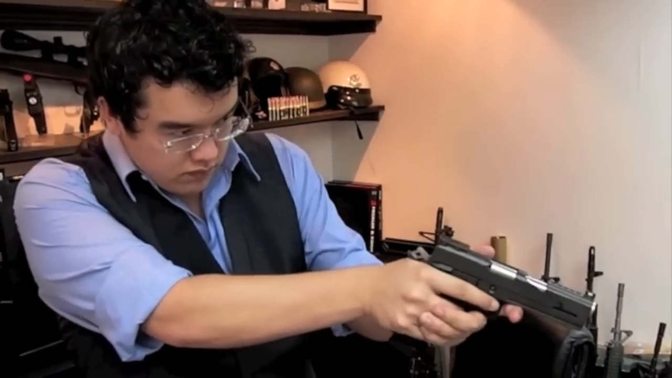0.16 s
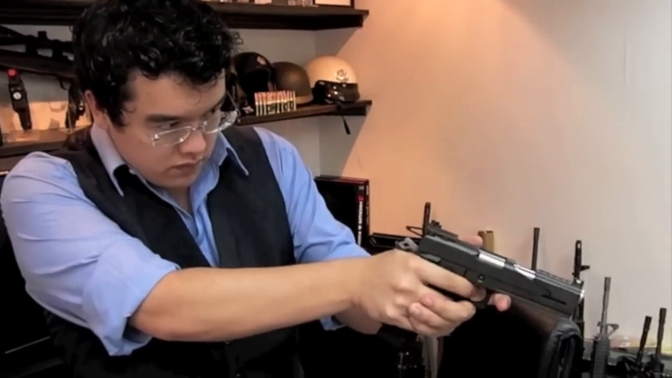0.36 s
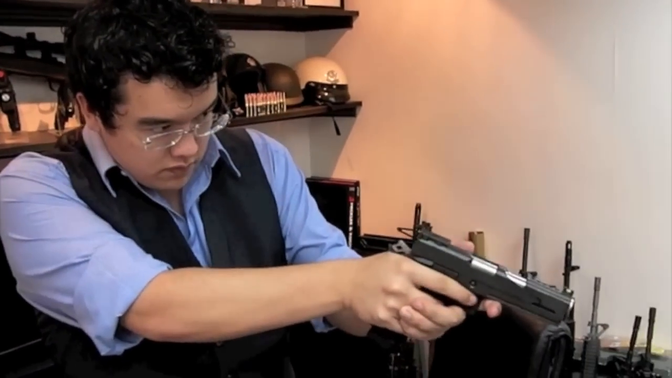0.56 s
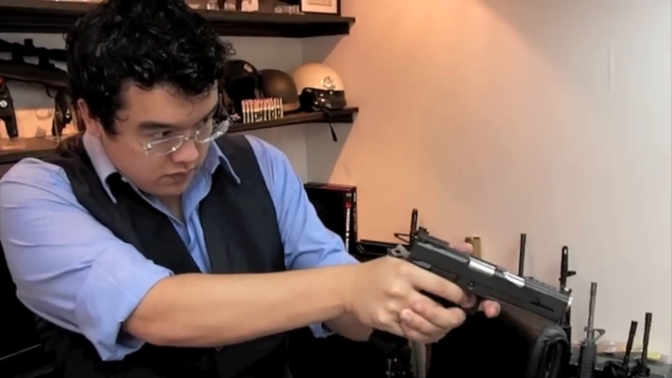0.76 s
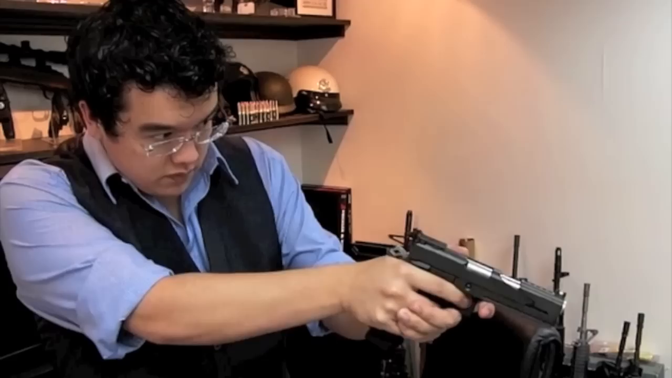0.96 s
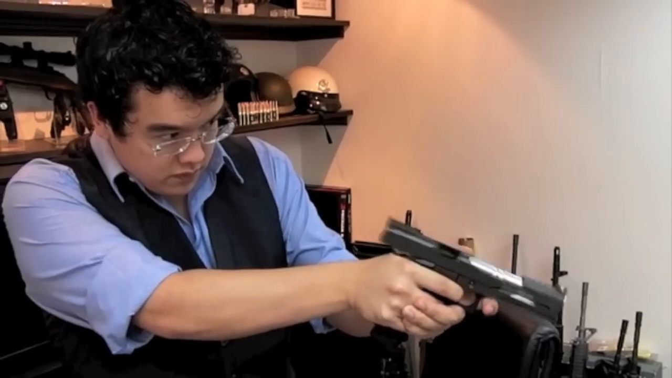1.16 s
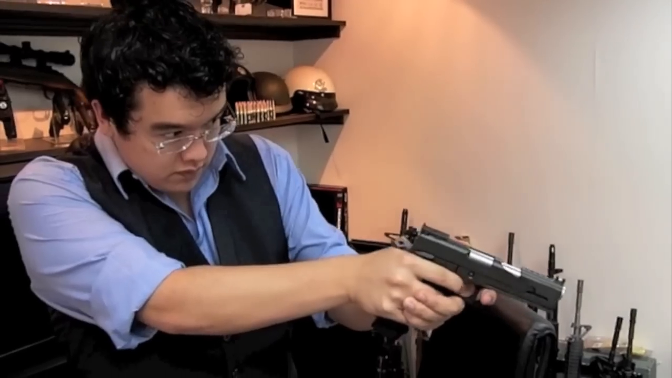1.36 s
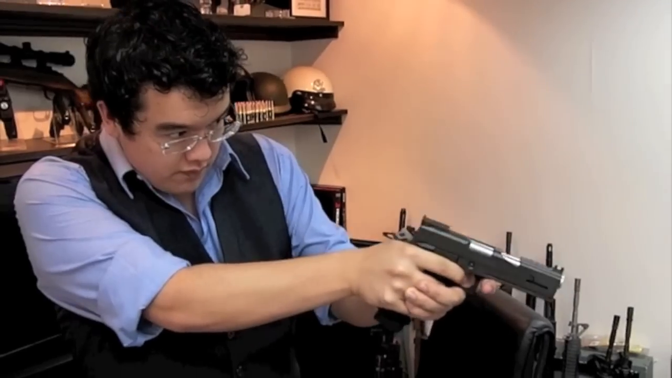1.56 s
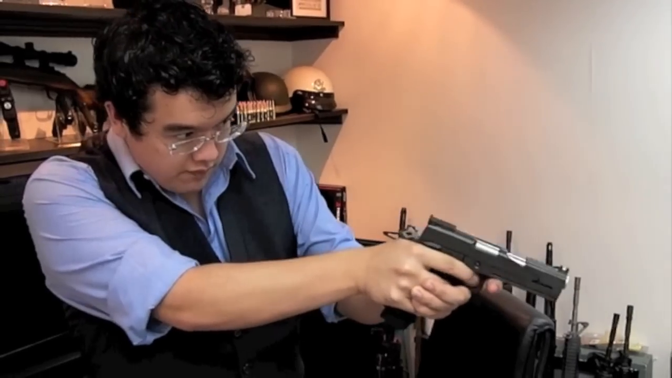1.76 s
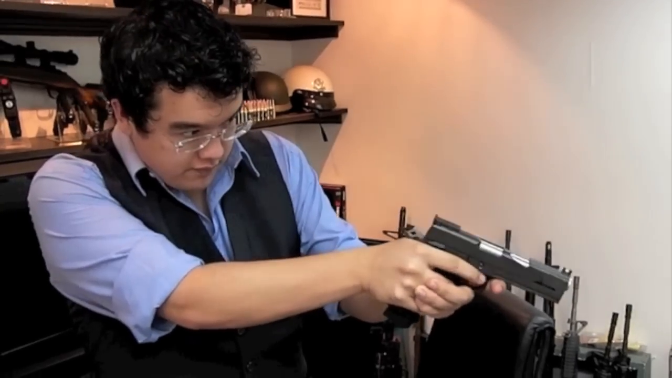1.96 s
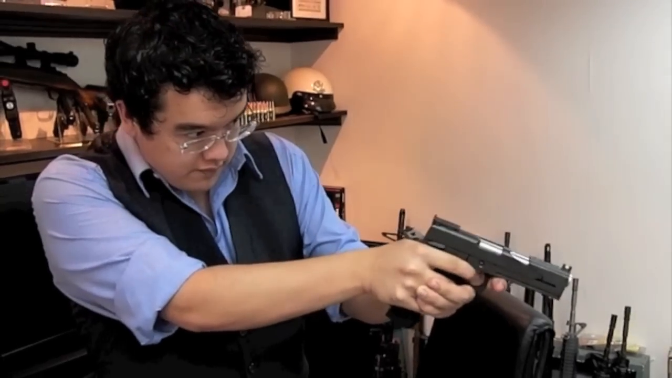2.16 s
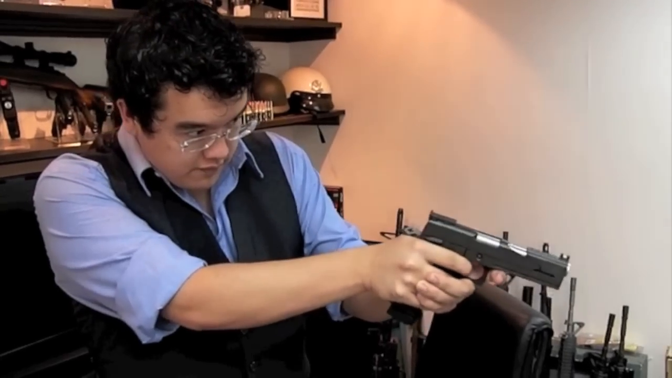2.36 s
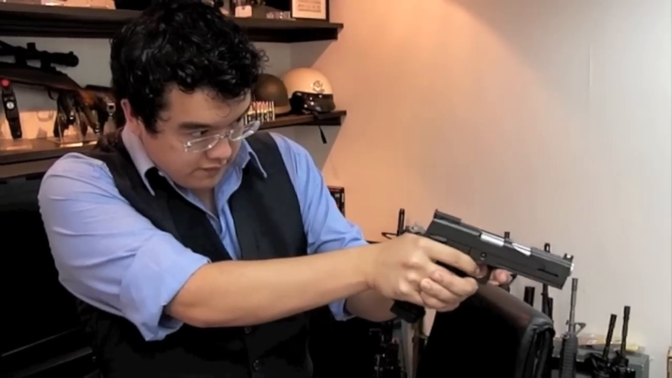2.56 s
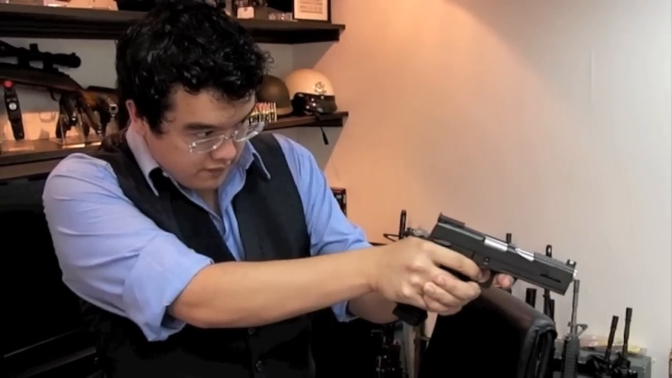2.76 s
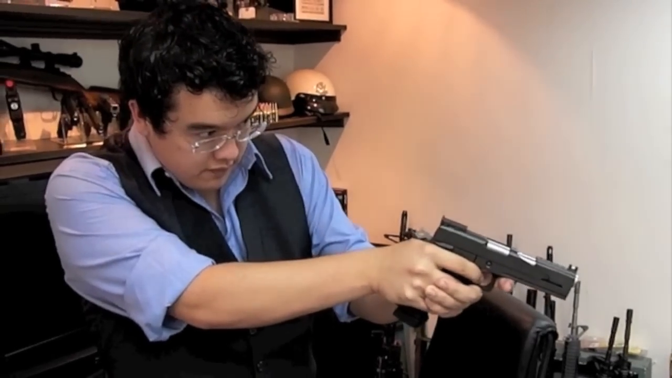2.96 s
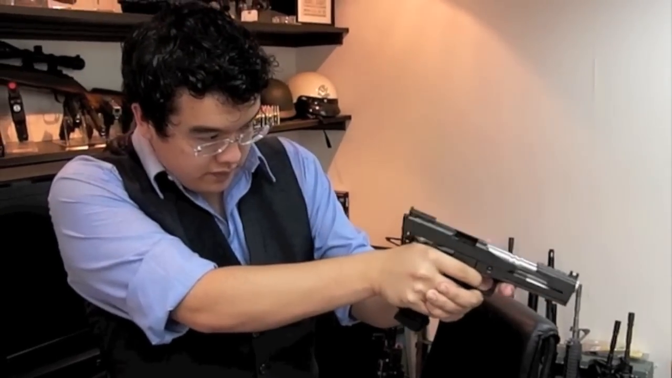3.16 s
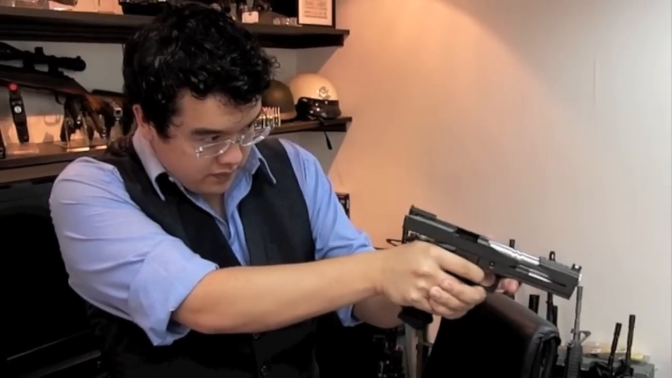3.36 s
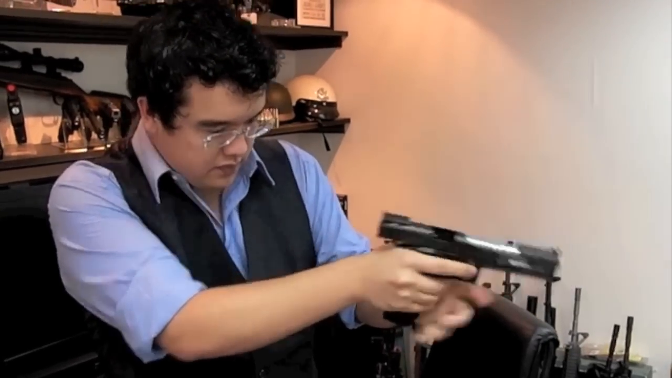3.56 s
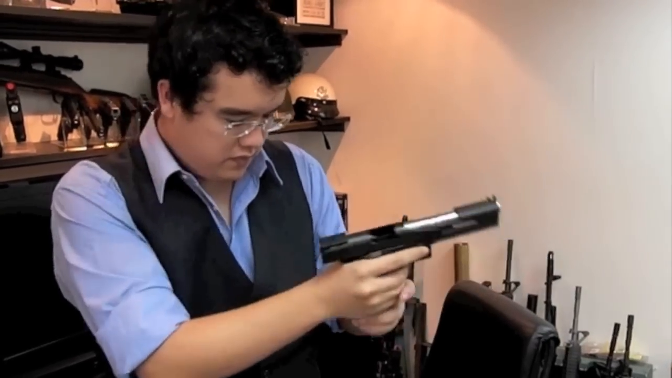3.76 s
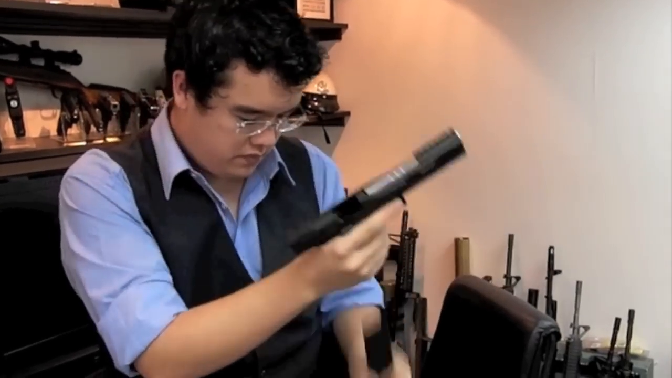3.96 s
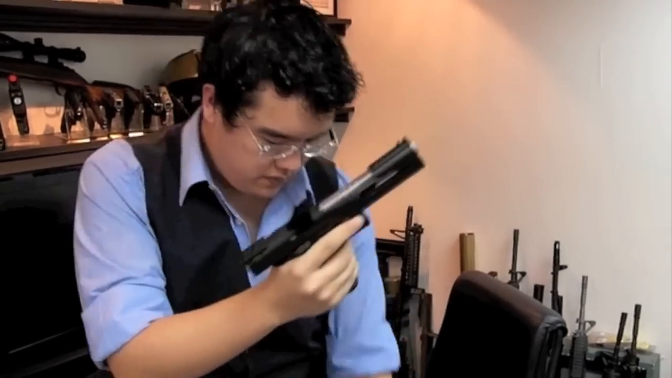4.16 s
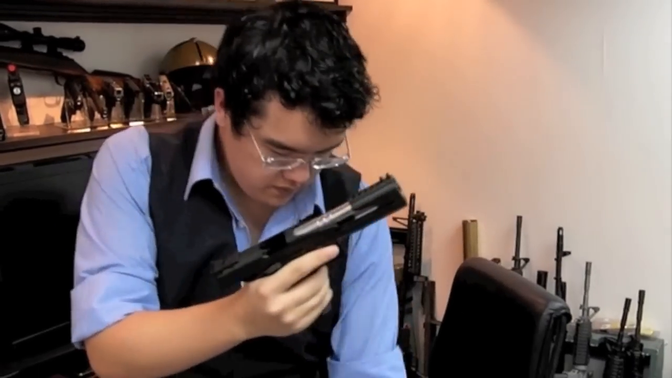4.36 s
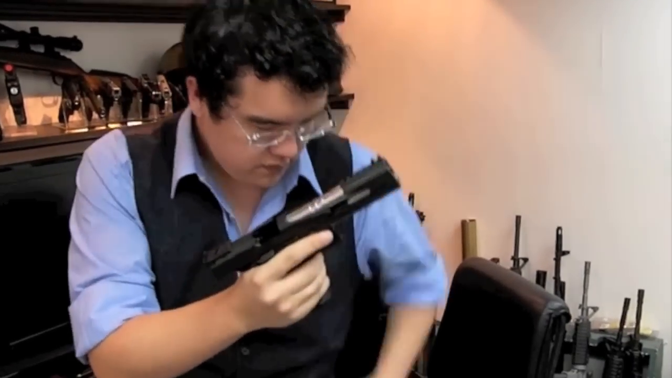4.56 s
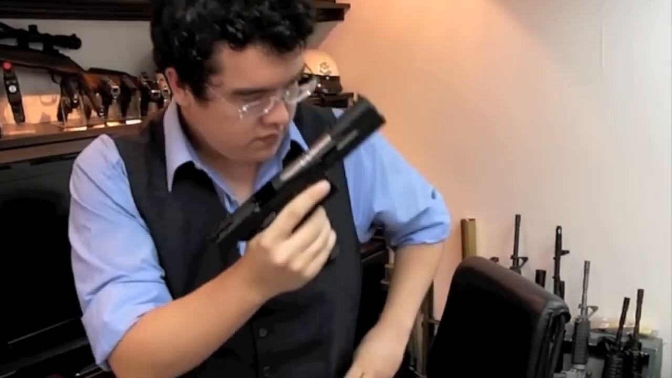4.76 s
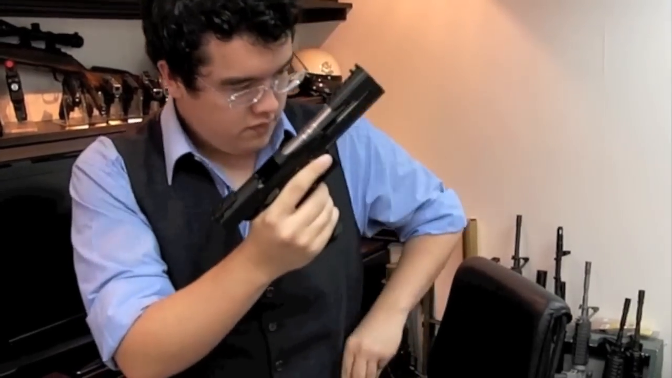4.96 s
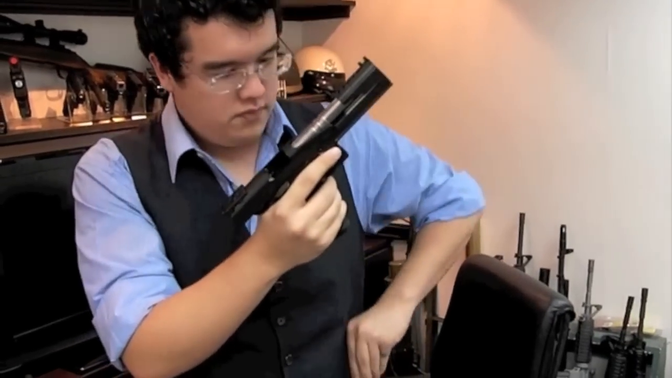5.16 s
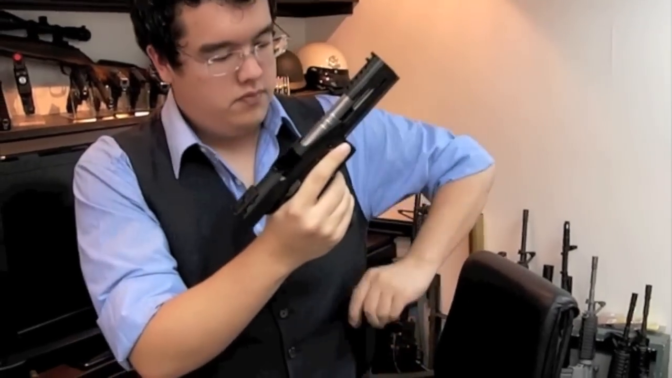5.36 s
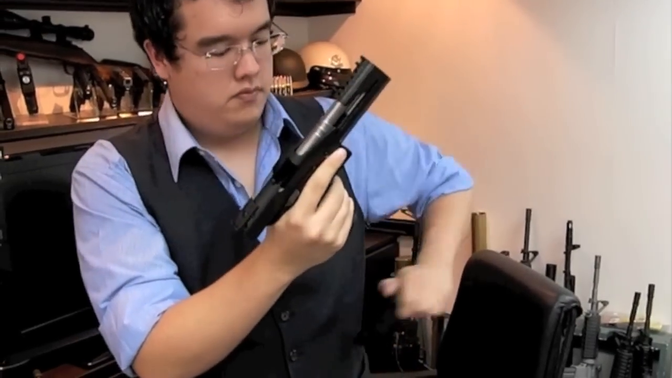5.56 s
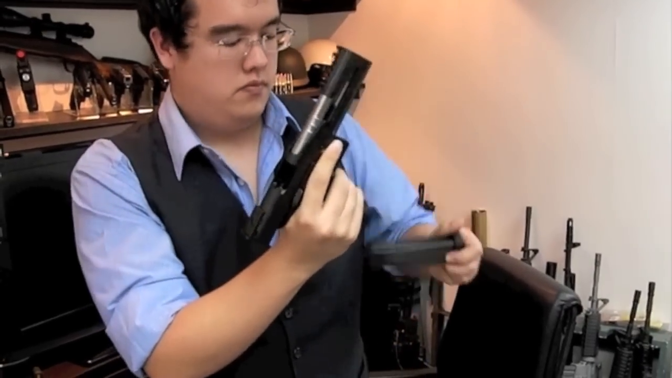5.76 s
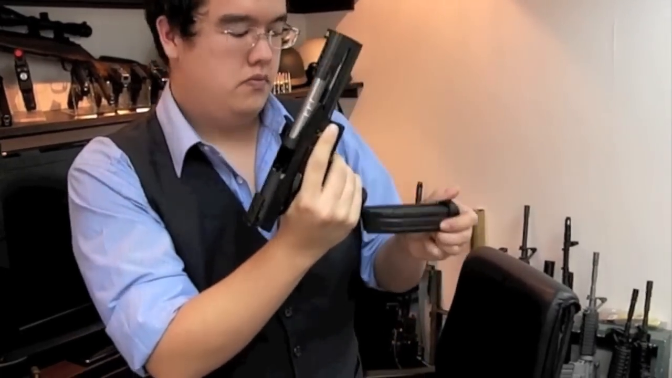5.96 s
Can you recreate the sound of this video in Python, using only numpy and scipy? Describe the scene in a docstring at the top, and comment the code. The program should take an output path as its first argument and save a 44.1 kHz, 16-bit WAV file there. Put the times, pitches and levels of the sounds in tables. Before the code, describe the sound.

A gas blowback airsoft pistol fires close to the microphone in a small room. Each shot is a sharp pop with the clack of a metal slide. Nine shots come in a quickening string, and after a pause a tenth locks the slide open. Quieter clicks and a knock follow as the magazine is drawn out, then faint scraping and a sleeve rustle. A fan and low electrical hum run underneath.

```python
"""A gas blowback airsoft pistol fires ten shots, close to a stereo microphone in a small, humming room.
Each shot is a chain: the hammer knocks the valve, gas pops from the muzzle, the slide hits its rear
stop and slams home. After the last shot the slide stays open; the magazine is drawn out and a fresh
one is fetched from the belt. The walls answer every blow, and the recorder's gain control ducks
the fan and mains hum under the shots."""
import sys
import numpy as np
from scipy import signal
from scipy.fft import rfft, irfft
from scipy.io import wavfile
from scipy.ndimage import uniform_filter1d, minimum_filter1d

SR = 44100
rng = np.random.default_rng(int(sys.argv[2]) if len(sys.argv) > 2 else 0)


def to_wav(sig):
    """Store sig (one row per channel, or 1-D mono) as 16-bit WAV at the path in sys.argv[1].

    Samples outside -1..1 are clipped; the rate is SR.
    """
    pcm = np.clip(np.atleast_2d(sig), -1, 1) * 32767
    pcm = np.round(pcm).astype(np.int16)
    wavfile.write(sys.argv[1], SR, pcm.T)  # frames by channels


N = 269010
TIME = np.arange(N) / SR
ANTIPHASE = np.array([[1], [-1]])  # left, right


def from_db(db):
    """Decibels to gain."""
    return 10 ** (np.asarray(db) / 20)


def rms_one(x):
    """Scale to rms 1."""
    return x / np.sqrt(np.mean(x ** 2) + 1e-20)


def flutter(span, size=N):
    """Random wobble of rms 1, smoothed over span samples."""
    return rms_one(uniform_filter1d(rng.standard_normal(size), span))


def at_hz(points, hz):
    """A spectrum read on a log-frequency axis."""
    points = np.array(points)
    return np.interp(np.log(hz + 1), np.log(points[:, 0] + 1), points[:, 1])


def colour(x, spectrum, tilt_db=0, size=8192):
    """Minimum-phase filter with the given spectrum, tilted by tilt_db per octave about 2 kHz."""
    hz = np.arange(size // 2 + 1) * SR / size
    octaves = np.log2(np.maximum(hz, 250) / 2000)
    cepstrum = irfft(np.log(from_db(at_hz(spectrum, hz) + tilt_db * octaves)))
    cepstrum[1:size // 2] *= 2
    cepstrum[size // 2 + 1:] = 0
    return signal.fftconvolve(x, irfft(np.exp(rfft(cepstrum))))[:len(x)]


def crossover(x, hz):
    """Split into lows and highs."""
    return [signal.sosfilt(signal.butter(3, hz, kind, fs=SR, output="sos"), x)
            for kind in ("low", "high")]


def noise(spectrum):
    """Coloured noise of rms 1."""
    return rms_one(colour(rng.standard_normal(N), spectrum))


def add(out, sound, s):
    """Mix a sound in at a time."""
    i = max(round(s * SR), 0)
    out[i:i + len(sound)] += sound[:N - i]


def strikes(rows):
    """One click for each (time [s], level [dB])."""
    out = np.zeros(N)
    for s, db in rows:
        out[round(s * SR)] += from_db(db)
    return out


def ring(x, modes):
    """The input sets each mode ringing as a decaying sine."""
    out = 0
    for k, (hz, db, t60) in enumerate(modes):
        r, w = np.exp(-np.log(1000) / (t60 * SR)), 2 * np.pi * hz / SR
        mode = signal.lfilter([0, np.sin(w)], [1, -2 * r * np.cos(w), r * r], x + 1e-18)
        out = out + (-1) ** k * from_db(db) * mode
    return out


def struck(rows, modes, spread_db=1.5):
    """Blows (time [s], level [dB]) on steel; each wakes every mode with a strength of its own."""
    offsets_db = spread_db * rng.standard_normal((len(rows), len(modes)))
    out = 0
    for mode, offsets in zip(modes, offsets_db.T):
        blows = strikes([(s, db + offset) for (s, db), offset in zip(rows, offsets)])
        out = out + ring(blows, [mode])
    return out


def bursts(rows, spectrum, lead_s, hold_s, decay_s, rattle_db, rattle_s):
    """Runs of tiny impacts that rise, hold and rattle out: (time [s], level [dB], tilt [dB/octave])."""
    size, spread_db = 3072, 3.5
    out, t = np.zeros(N), (np.arange(size) - 300) / SR
    after = np.maximum(t - hold_s, 0)
    fall = np.exp(-after / decay_s) + from_db(rattle_db) * np.exp(-after / rattle_s)
    shape = np.exp(np.minimum(t, 0) / lead_s) * fall
    for s, db, tilt_db in rows:
        impacts = rng.choice([-1, 1], size) * from_db(spread_db * rng.standard_normal(size))
        burst = colour(shape * impacts, spectrum, tilt_db)
        burst *= np.sqrt(np.sum(shape ** 2) / np.sum(burst ** 2))
        add(out, from_db(db) * burst, s + t[0])
    return out


def puffs(rows, size=1024):
    """One short swing of air pressure for each (time [s], level [dB], width [s])."""
    out, t = np.zeros(N), (np.arange(size) - size // 2) / SR
    for s, db, width_s in rows:
        u = t / width_s
        add(out, from_db(db) * u * np.exp((1 - u * u) / 2), s + t[0])
    return out


def swells(rows):
    """One bell curve for each (middle [s], half length [s], level [dB])."""
    return sum(from_db(db) * np.exp(-np.minimum(((TIME - s) / half_s) ** 2, 50))
               for s, half_s, db in rows)


# mains hum and fan tones in the room: (frequency [Hz], level [dB])
HUM_TONES = [(53.8, -51), (102.3, -46.5), (199.2, -51), (301.5, -51.5), (339.1, -58.5), (398.4, -60.5),
             (532.9, -63), (721.4, -63), (904.4, -61), (1082, -69.5), (1448, -64), (1626, -72)]
# fan rush at the microphone, shared by both sides and opposed between them: (frequency [Hz], level [dB])
FAN_MID = [(12, -44), (20, -7.5), (101, -4), (158, -10.5), (262, -10), (293, -15), (367, -16), (923, -23),
           (1330, -27.5), (1480, -30), (2260, -29.5), (2820, -53.5), (7950, -51), (11800, -75),
           (16000, -38)]
FAN_SIDE = [(12, -37), (20, -6), (101, -2.5), (262, -6), (301, -5), (499, -11), (718, -6), (780, -15),
            (897, -3.5), (1220, -14), (1480, -0.5), (1610, -9.5), (2320, -13), (2910, -25.5), (16000, -23)]
def room_tone():
    """A fan's rush with mains hum and faint wavering tones."""
    mid, side = from_db(-45.5) * noise(FAN_MID), from_db(-50) * noise(FAN_SIDE)
    for hz, db in HUM_TONES:
        waver_hz = 1.5 * np.interp(TIME, np.linspace(0, TIME[-1], 60), rng.standard_normal(60))
        phase = 2 * np.pi * np.cumsum(hz + waver_hz) / SR
        mid = mid + from_db(db) * np.sqrt(2) * np.sin(phase)
    return from_db(1.8) * (mid + side * ANTIPHASE)


# (time [s], trigger [dB], hammer [dB], valve crack [dB], gas push [dB], closing tick [dB], clack [dB])
SHOTS = [(0.0476, -45, 0, -7, -25, -23.5, -16), (0.4604, -31.5, -0.5, -8.5, -19.5, -14, -13.5),
         (0.8651, -31, 1, -3.5, -24, -13.5, -15), (1.2103, -30.5, -1, -5.5, -24.5, -11, -16),
         (1.4671, -34.5, -4, -29.5, -41.5, -12.5, -8), (1.6731, -44.5, -2.5, -26.5, -38.5, -13, -12),
         (1.8882, -27, 1.5, -25, -43, -12.5, -14.5), (2.1093, -41, -1, -23, -37, -14.5, -14),
         (2.3457, -30.5, -1.5, -26.5, -32, -11, -7.5), (3.1306, -48, 1.5, -45.5, -24, None, None)]
# small parts clicking and rubbing in the hands: (frequency [Hz], level [dB])
CLICK_COLOUR = [(100, -33.5), (700, -27.5), (1100, -5.5), (1600, 3), (2300, 5), (3100, 1), (3700, -7),
                (4700, -8), (5600, -8), (7500, -25), (11000, -12), (16000, -33.5)]
TRIGGER_LEAD_S = 0.031
def trigger():
    """The trigger creaks just before each fall of the hammer."""
    pulls = [(s - TRIGGER_LEAD_S, db, 1.5) for s, db, *_ in SHOTS]
    return bursts(pulls, CLICK_COLOUR,
                  lead_s=0.001, hold_s=0.0037, decay_s=0.009, rattle_db=-4, rattle_s=0.026)


def shot_timing(pause_s=0.43):
    """Per shot: its time, its progress through the ten (0-1) and how quickly it follows (0-1)."""
    times = np.array([shot[0] for shot in SHOTS])
    quickness = np.clip(1 - np.diff(times, prepend=-np.inf) / pause_s, 0, 1)
    return times, np.linspace(0, 1, len(times)), quickness


# the hammer's blow, heard close: (frequency [Hz], level [dB])
HAMMER_COLOUR = [(40, -32.5), (200, -22), (400, -2), (600, -1.5), (1050, -8), (1450, 0), (1850, 0.5),
                 (2300, 2), (3700, -4.5), (5500, -9), (7700, -33), (9000, -16), (10600, -6.5), (13000, -14),
                 (16000, -44)]
# dull knock of the held frame, and ring of slide and frame: (frequency [Hz], level [dB], t60 [s])
FRAME_MODES = [(198.6, -7, .02), (372.5, 3, 0.022)]
STEEL_MODES = [(1240, 0.5, 0.088), (1400, -6.5, 0.11), (1590, -6.5, 0.039), (2000, -4, .22),
               (2230, -7.5, 0.28), (2340, -3.5, 0.16), (3297, -17.5, 0.18), (3640, -15.5, .13),
               (4100, -15.5, 0.09), (4600, -6.5, .15), (10000, -0.5, .12), (10350, 4, .16),
               (10950, 0.5, .12)]
def hammer():
    """The hammer falls, the frame knocks and the steel rings; quick and later shots sound duller."""
    times, progress, quickness = shot_timing()
    tilts_db = 2.19 - 0.5 * quickness - 0.55 * progress
    falls = [(s, db - 4, tilt) for (s, _, db, *_), tilt in zip(SHOTS, tilts_db)]
    blow = bursts(falls, HAMMER_COLOUR,
                  lead_s=0.0013, hold_s=0.0027, decay_s=0.004, rattle_db=-16, rattle_s=0.008)
    knock = ring(strikes(zip(times, -11.5 - 11.5 * quickness)), FRAME_MODES)
    return blow + knock + struck([(s, -57.5) for s in times], STEEL_MODES)


def gas_push(delay_s=0.00033, width_s=0.0012):
    """Escaping gas gives a low push of air."""
    return puffs([(s + delay_s, db, width_s) for s, *_, db, _, _ in SHOTS])


# bright edge on a shot's attack, heard close: (frequency [Hz], level [dB])
EDGE_COLOUR = [(60, -38), (300, -18), (900, -3), (1500, 2), (2000, 7.5), (3000, -5), (5200, 11), (8000, 3),
               (11000, -1), (16000, -13)]
def harsh_edge(delay_s=0.0004):
    """Shots after a pause have a brighter, harsher edge than those in quick succession."""
    times, _, quickness = shot_timing()
    edges = [(s + delay_s, db, 0) for s, db in zip(times, -6 - 35.5 * quickness)]
    return bursts(edges, EDGE_COLOUR,
                  lead_s=0.00015, hold_s=0.001, decay_s=0.0009, rattle_db=-25, rattle_s=0.004)


def valve_crack(delay_s=0.003, width_s=0.00004):
    """One very short swing of pressure as the valve bursts open."""
    return puffs([(s + delay_s, db, width_s) for s, _, _, db, *_ in SHOTS])


# pop and hiss at the muzzle, heard close: (frequency [Hz], level [dB])
POP_COLOUR = [(50, -22), (100, -20), (160, -8.5), (240, -4.5), (330, 5), (480, -0.5), (570, 1.5),
              (700, 7.5), (860, 0), (1000, -1), (1220, 9), (1550, 7.5), (4000, 0)]
HISS_COLOUR = [(60, -36), (200, -14), (1300, 2), (4000, 1), (8000, -8.5), (16000, -20.5)]
def muzzle(delay_s=0.0115, chill_lag_s=0.0013, width_s=0.00012):
    """Gas pops from the muzzle, later in the last, chilled shots; the hiss is louder after a pause."""
    times, progress, quickness = shot_timing()
    pop_times = times + delay_s + chill_lag_s * progress ** 5
    pop = -colour(swells([(s, width_s * np.sqrt(2), 4) for s in pop_times]), POP_COLOUR)
    hisses = [(s, db, 0) for s, db in zip(pop_times, -12 - 17.5 * quickness)]
    return pop + bursts(hisses, HISS_COLOUR,
                        lead_s=0.0003, hold_s=0.0008, decay_s=0.0016, rattle_db=-23.5, rattle_s=0.0044)


# the slide's tick against either stop: (frequency [Hz], level [dB])
SLIDE_COLOUR = [(60, -35.5), (200, -30), (400, -7), (900, -8), (1500, -3.5), (2200, 0.5), (3600, -6),
                (5200, -7.5), (7500, -28.5), (9000, -10), (10600, 4), (11700, -2), (12800, -16),
                (16000, -33)]
BOUNCE_S, BOUNCE_DB = 0.0048, -5
def slide_back(delay_s=0.0195, chill_lag_s=0.0044, tilt_db=-3.5):
    """The slide hits its rear stop, rings and bounces once, arriving later as the gas chills."""
    times, progress, _ = shot_timing()
    stop_times = times + delay_s + chill_lag_s * progress
    touches = ((0, 0), (BOUNCE_S, BOUNCE_DB))
    stops = [(s + late_s, db - 13.5, tilt_db) for s in stop_times for late_s, db in touches]
    ticks = bursts(stops, SLIDE_COLOUR,
                   lead_s=0.00053, hold_s=0.0017, decay_s=0.0009, rattle_db=-15.5, rattle_s=0.006)
    return ticks + struck([(s, -47.5) for s in stop_times], STEEL_MODES)


# ring of the slide meeting the barrel: (frequency [Hz], level [dB], t60 [s])
CLACK_MODES = [(370, -21, .025), (1252, -12.5, 0.08), (1770, -13.5, 0.012), (1929, -7, .03),
               (2170, 1, 0.061), (2200, -10, 0.037)]
# broad body of that clack: (frequency [Hz], level [dB])
CLACK_COLOUR = [(60, -51), (200, -26.5), (800, -21.5), (1200, -6.5), (1700, 1.5), (2300, 7), (3000, -5.5),
                (4300, -6), (6500, -23.5), (16000, -45.5)]
def slide_home(delay_s=0.0597, pickup_s=0.0018, tilt_db=2.5):
    """The slide picks up the barrel, slams home and bounces once, with a briefly ringing clack."""
    closings = [(s + delay_s, tick, clack) for s, *_, tick, clack in SHOTS if tick is not None]
    touches = ((-pickup_s, -3), (0, 0), (BOUNCE_S, BOUNCE_DB))
    hits = [(s + late_s, tick + db, tilt_db) for s, tick, _ in closings for late_s, db in touches]
    ticks = bursts(hits, SLIDE_COLOUR,
                   lead_s=0.00014, hold_s=0.0007, decay_s=0.0005, rattle_db=-22, rattle_s=0.0041)
    slams = [(s, clack) for s, _, clack in closings]
    body = bursts([(s, db + 1, 0) for s, db in slams], CLACK_COLOUR,
                  lead_s=0.0006, hold_s=0.00095, decay_s=0.00058, rattle_db=-11, rattle_s=0.0024)
    bounces = [(s + BOUNCE_S * rng.uniform(0.8, 1.2), db - 6) for s, db in slams]
    clacks = from_db(-5.5) * struck(slams + bounces, CLACK_MODES)
    steel = from_db(-28.5) * struck(slams, STEEL_MODES)
    return from_db(-3) * ticks + body + clacks + steel


# clicks at the shooter's hands: (time [s], level [dB], tilt [dB/octave], chatter [s])
CLICKS = [(2.853, -36.5, 5, 0.0022), (3.011, -35, 4, 0.0022), (3.06, -28.5, 0, 0.0034),
          (3.502, -20.5, 2.5, .002), (3.510, -21, 2, 0.0027), (3.674, -14.5, -2, 0.00088),
          (3.823, -31, 3, 0.0016), (3.94, -21.5, 0.5, 0.0025), (3.958, -34, 0, 0.0027),
          (4.348, -18, 1.5, 0.0025), (4.365, -16, -8, 0.0031), (4.41, -24, -7, 0.0065),
          (4.647, -15, 0, 0.0016), (5.090, -35.5, -3, 0.0054), (5.238, -38, -7.5, 0.012),
          (5.454, -35.5, -7.5, 0.0045), (5.535, -26, -1.5, 0.0015), (5.545, -33.5, -2.5, 0.0028)]
def clicks():
    """Grip, catch and magazine each chatter for a moment as they make contact."""
    return sum(bursts([(s, db - 6, tilt_db)], CLICK_COLOUR,
                      lead_s=0.00038, hold_s=chatter_s, decay_s=0.0037, rattle_db=-3, rattle_s=0.0036)
               for s, db, tilt_db, chatter_s in CLICKS)


# strokes at the grip and the pouch: (middle [s], half length [s], level [dB])
STROKES = [(2.87, 0.036, -56), (3.05, 0.071, -47), (3.855, 0.03, -33.5), (3.93, 0.032, -28.5),
           (4.27, 0.64, -53.5), (4.39, 0.05, -45), (4.56, 0.058, -47), (5.45, 0.56, -51.5)]
def rubbing(grit):
    """Hands shift on the grip and the magazine slides, with gritty friction."""
    return from_db(-1) * swells(STROKES) * grit * noise(CLICK_COLOUR)


# the magazine knocked in the hand: (time [s], level [dB], width [s])
MAGAZINE_KNOCKS = [(4.364, -16.5, 0.00022)]
# its hollow body: (frequency [Hz], level [dB], t60 [s])
MAGAZINE_MODES = [(292, -40, 0.044), (453, -31.5, 0.038)]
# its small steel parts: (time [s], frequency [Hz], level [dB], t60 [s])
MAGAZINE_PINGS = [(4.350, 9280, -36.5, 0.071), (4.350, 10000, -36.5, .02), (4.647, 12000, -39, 0.02)]
def magazine():
    """A knock rings the magazine's hollow body, and its small parts ping."""
    body = ring(strikes([(s, 0) for s, _, _ in MAGAZINE_KNOCKS]), MAGAZINE_MODES)
    pings = sum(ring(strikes([(s, 0)]), [mode]) for s, *mode in MAGAZINE_PINGS)
    return puffs(MAGAZINE_KNOCKS) + body + pings


# scrapes down at the belt: (middle [s], half length [s], level [dB])
POUCH_STROKES = [(5.12, .08, -66), (5.4, 0.22, -56), (5.85, 0.18, -66)]
# their colour: (frequency [Hz], level [dB])
POUCH_COLOUR = [(800, -22), (2300, 7.5), (3200, 0), (4500, -12), (7000, -15), (10500, -3.5), (16000, -13)]
def pouch(grit, snag_db=8):
    """The magazine snags and slips against the mouth of the pouch."""
    snags = rms_one(from_db(snag_db * flutter(900)))
    return swells(POUCH_STROKES) * snags * grit * noise(POUCH_COLOUR)


# the sleeve's sweep at the shooter's side: (middle [s], half length [s], level [dB])
SLEEVE_STROKES = [(5.68, 0.24, -54)]
# its colour: (frequency [Hz], level [dB])
SLEEVE_COLOUR = [(100, -11), (350, -7), (750, 15.5), (1300, -10.5), (3000, -28), (12000, -39.5)]
def sleeve():
    """Cloth catches and slips as the sleeve brushes the waistcoat."""
    folds = from_db(-2.5 * flutter(700))
    return from_db(-1) * swells(SLEEVE_STROKES) * folds * noise(SLEEVE_COLOUR)


# decay of the small room: (frequency [Hz], t60 [s])
ROOM_T60 = [(100, 0.44), (300, 0.36), (750, 0.24), (1800, 0.2948), (4000, 0.34), (7500, 0.28), (10500, 0.3),
            (15000, 0.24)]
# its reverberation at the microphone: (frequency [Hz], level [dB])
ROOM_COLOUR = [(50, -22), (120, -9), (180, -1.5), (300, -3.5), (600, -2.5), (900, -7.5), (1300, -2.5),
               (2200, 0.5), (4000, 1.5), (5500, -5.5), (7500, -10.5), (8600, -3), (9500, 2.5),
               (11500, -3.5), (12800, -6.5), (15000, -7.5)]
def room_response(size=26000, clump_db=3.5):
    """Dense reflections build up quickly, arrive in clumps and die at their own rate in each band."""
    t, white = np.arange(size) / SR, rfft(rng.standard_normal(size))
    hz, tail = np.arange(len(white)) * SR / size, 0
    for centre, t60 in ROOM_T60:
        band = at_hz([(other, other == centre) for other, _ in ROOM_T60], hz)
        tail = tail + irfft(white * band, size) * np.exp(-np.log(1000) * t / t60)
    clumps = from_db(clump_db * flutter(110, size))
    build_up = np.clip((t - 0.003) / 0.0066, 0, 1)
    tail = tail * clumps * build_up
    return colour(tail / np.linalg.norm(tail), ROOM_COLOUR)


# room sound opposed between the microphone's two ports: (frequency [Hz], level [dB])
SIDE_COLOUR = [(60, -4.5), (200, -10), (600, 3.5), (1300, -2.5), (2300, 0), (3600, 2), (4800, -6.5),
               (7000, -14.5), (8700, -13), (10300, -4.5), (11500, -10), (12600, -20), (15000, -19)]
def side_response():
    """Reflections, first from close by and then from the walls, that reach the two ports unequally."""
    near = rng.standard_normal(400) * np.hanning(400)
    out = from_db(-14.5) * room_response()
    add(out, from_db(-8) * near / np.linalg.norm(near), 0)
    return colour(out, SIDE_COLOUR)


def reflect(x, response):
    """Long waves meet the same room every time; short ones find new paths after each recoil."""
    low, high = crossover(x, hz=800)
    out = signal.fftconvolve(low, response())[:N]
    edges = [0] + [round((s - TRIGGER_LEAD_S) * SR) for s, *_ in SHOTS[1:]] + [N]
    for start, end in zip(edges, edges[1:]):
        add(out, signal.fftconvolve(high[start:end], response()), start / SR)
    return out


# standing waves between the walls: (frequency [Hz], level [dB], t60 [s])
ROOM_MODES = [(203, -9, 0.39), (211.2, 1.5, .3), (264.7, 2, 0.1), (306, 6, 0.076), (334.5, 2, 0.24),
              (359, -8.5, 0.39), (444, -1, .15), (461.2, 3.5, 0.23), (506, -0.5, 0.22), (655, -4, 0.14),
              (684, 1, 0.053), (758, 3, 0.11), (783.4, 3.5, 0.14), (1056, -8.5, 0.34), (1292, -1, 0.27),
              (1462, 1, 0.15), (1860, 1, 0.2)]
def room(x):
    """The room's answer as mid (reflections and standing waves) and side (unequal reflections)."""
    mid = from_db(-4.5) * reflect(x, room_response) + from_db(-56) * ring(x, ROOM_MODES)
    return mid, reflect(x, side_response)


# dips in the microphone's response: (frequency [Hz], width [Hz])
MIC_NOTCHES = [(2850, 1010), (4980, 140)]
def microphone(mid, side):
    """Two ports, each with its own colour and both with two dips; the right flips in the treble."""
    left = colour(mid + side, [(300, -0.1), (700, -0.1), (1400, 0.9), (2500, 1.7), (5000, 2),
                               (7500, 0.5), (10300, -3), (12600, -0.2), (14000, -1)])
    right = colour(mid - side, [(300, 0.68), (700, 1.3), (1400, -0.034), (2500, 2.6), (5000, 1.7),
                                (7500, -0.53), (10300, 2), (12600, -1), (14000, -2.5)])
    x = np.array([left, right])
    for hz, width_hz in MIC_NOTCHES:
        x = signal.lfilter(*signal.iirnotch(hz, hz / width_hz, fs=SR), x)
    low, high = crossover(x, hz=1270)
    return low + high * ANTIPHASE


def scene():
    """The pistol, close and off the walls, over room tone; the valve's crack meets both ports in step."""
    pistol_gain = from_db(19.5)
    shot = pistol_gain * (hammer() + gas_push() + harsh_edge() + muzzle() + slide_back())
    crack, closing = pistol_gain * valve_crack(), pistol_gain * slide_home()
    grit = np.abs(flutter(130))
    hands = trigger() + clicks() + rubbing(grit) + magazine() + pouch(grit) + sleeve()
    # the closing slide sounds closer and drier; the hands sound more distant and roomy
    direct = shot + from_db(2.5) * closing + from_db(-1) * hands
    room_mid, room_side = room(shot + crack + closing + from_db(1.5) * hands)
    return microphone(direct + room_mid, room_side) + crack + room_tone()


def limiter(x, threshold_db, recovery_db_per_s, size=260):
    """Looks a few ms ahead, pulls the gain down on each shot and lets it creep back."""
    power = uniform_filter1d(np.mean(x ** 2, axis=0), size // 2)
    over_db = np.maximum(10 * np.log10(np.maximum(power, 1e-12)) - threshold_db, 0)
    recovery_db = recovery_db_per_s * TIME
    held_db = np.maximum.accumulate(over_db + recovery_db) - recovery_db
    gain_db = uniform_filter1d(minimum_filter1d(-held_db, 2 * size), size // 2)
    return x * from_db(gain_db)


def record(dry):
    """The recorder: slowly recovering gain control, a quick limiter, soft clipping, a steep top cut."""
    ducked = limiter(dry, threshold_db=3.5, recovery_db_per_s=4.5)
    limited = limiter(ducked, threshold_db=-6.5, recovery_db_per_s=34)
    rounded = limited / (1 + limited ** 4) ** (1 / 4)
    return signal.sosfilt(signal.ellip(10, 0.1, 80, 16200, fs=SR, output="sos"), rounded)


dry = scene()
out = record(dry)
to_wav(out)
```